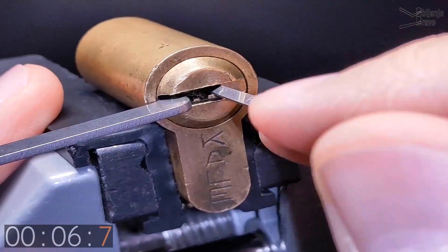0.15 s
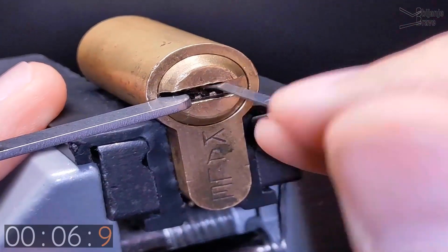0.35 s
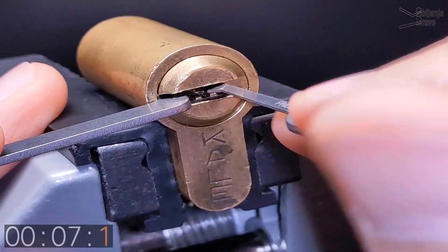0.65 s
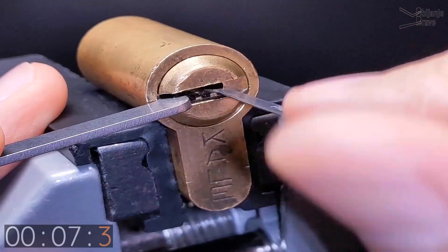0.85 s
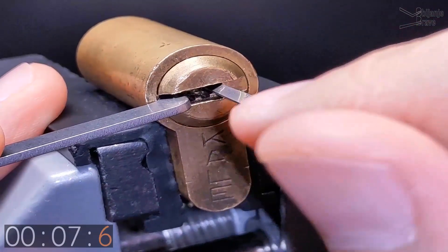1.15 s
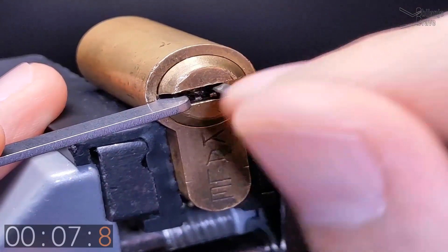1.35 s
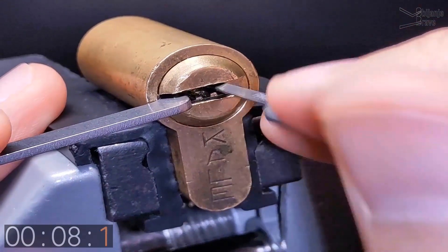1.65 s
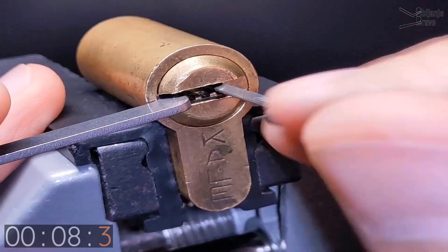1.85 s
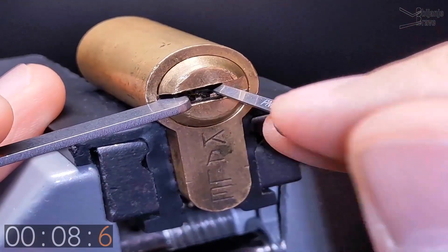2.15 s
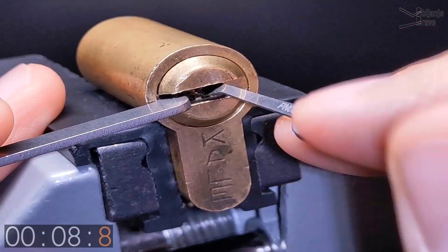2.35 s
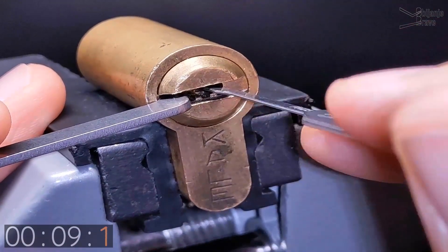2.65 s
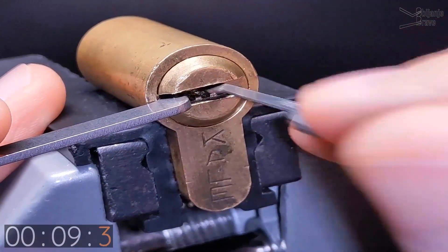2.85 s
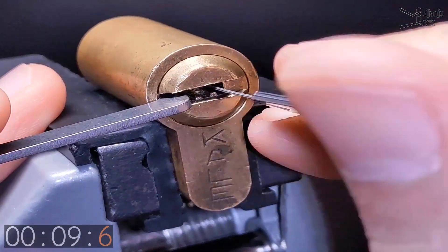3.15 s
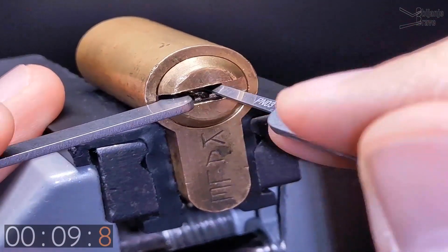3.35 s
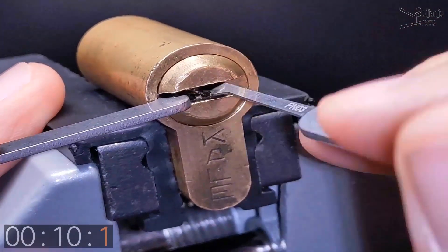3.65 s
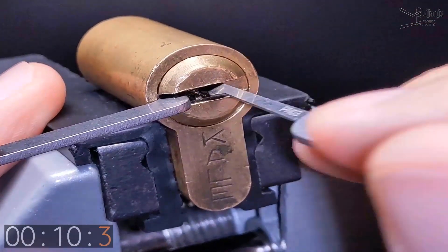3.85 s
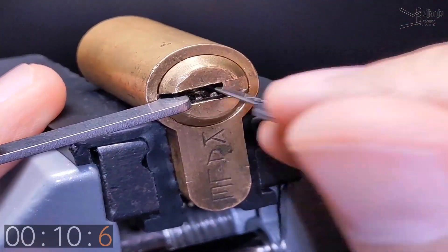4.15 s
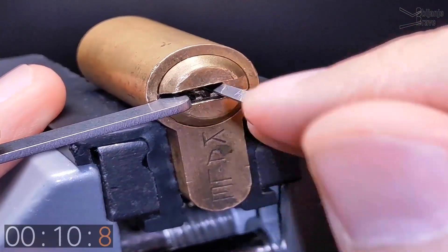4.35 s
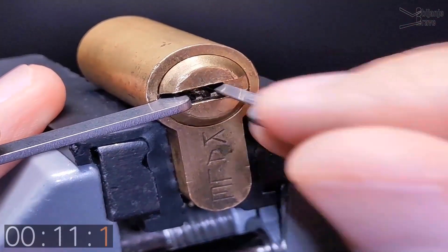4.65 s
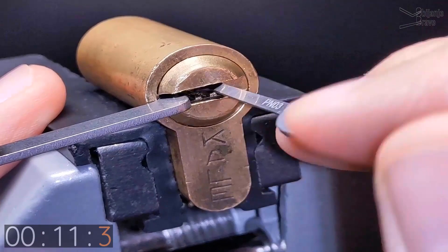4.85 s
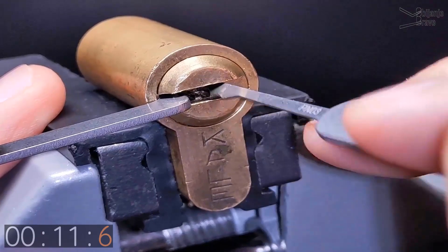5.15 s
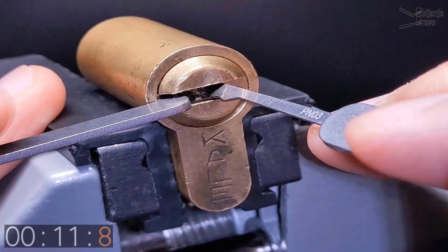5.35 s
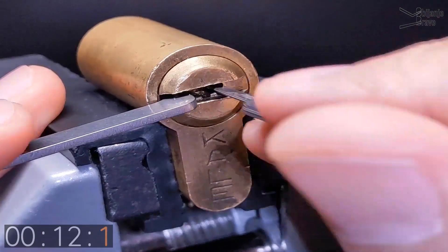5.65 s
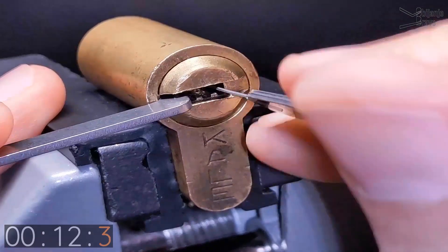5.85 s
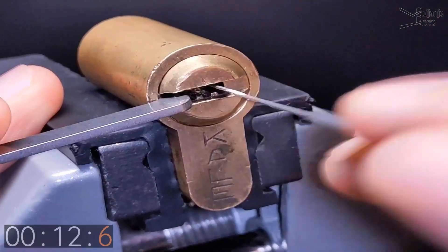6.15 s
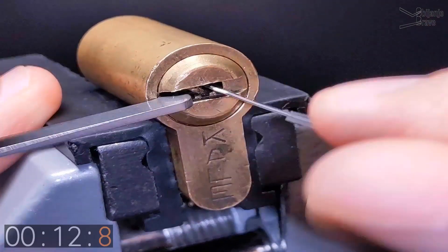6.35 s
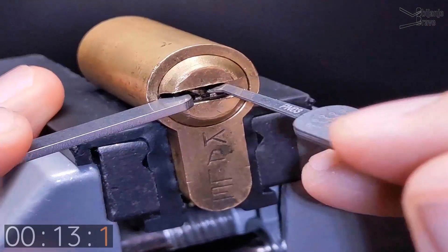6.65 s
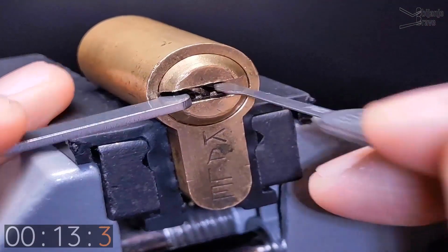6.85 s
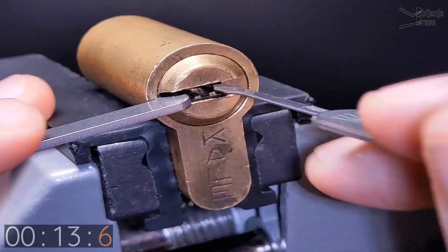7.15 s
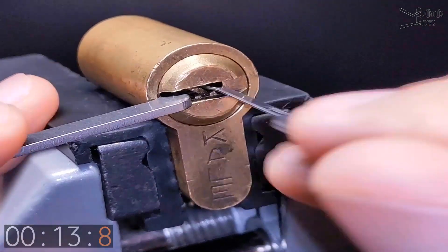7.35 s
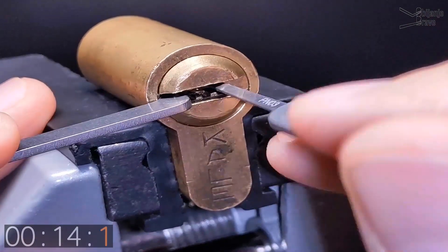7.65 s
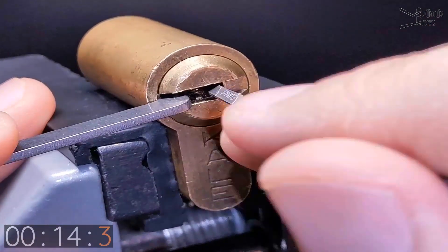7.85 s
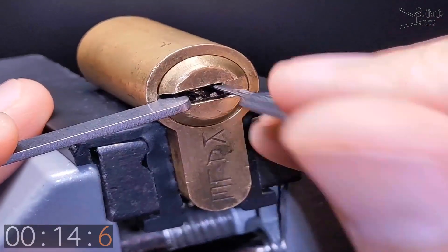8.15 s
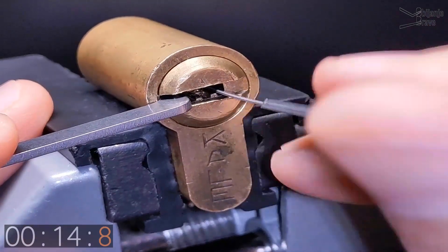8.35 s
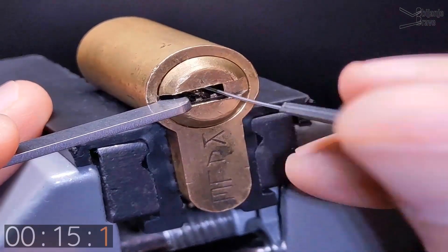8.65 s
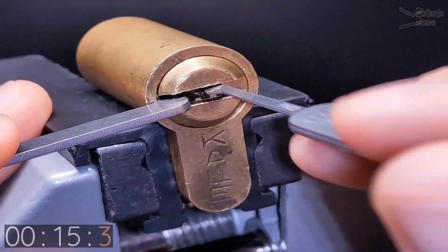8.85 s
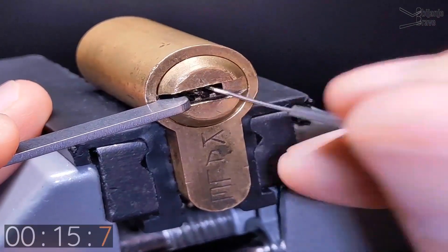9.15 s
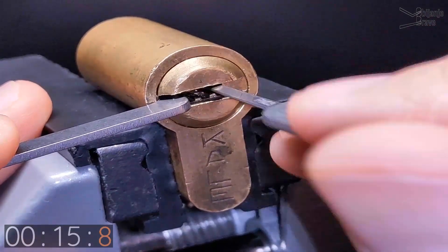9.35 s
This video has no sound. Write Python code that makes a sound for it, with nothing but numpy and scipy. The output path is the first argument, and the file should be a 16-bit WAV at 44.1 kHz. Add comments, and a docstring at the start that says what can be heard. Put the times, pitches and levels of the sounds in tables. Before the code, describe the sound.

Very close, quiet lock picking: pins snap off a steel blade with dry bright clicks, some doubled by a softer rebound, with light rattling between them. The blade's rubbing is almost inaudible. Sparse at first, busier and heavier after six seconds, when hands thud softly against the vice and the cylinder clunks in its jaws, then lighter again. A deep, gently swelling hum, low rumble and faint hiss continue throughout in a small room.

```python
"""Over a low, slowly swelling hum and a faint hiss, pins tick close to the microphone in a quiet room.
A steel pick is raked in and out of a brass lock cylinder held in a small vice on a bench.
Each snap is noise bursts and decaying sines: a bright tick, a knock of the lock body, a shudder of the clamp.
Jostled pins rattle lightly during the strokes, whose own rub is all but inaudible; once the blade squeaks.
The hands bump the vice and the cylinder shifts in its jaws: soft pushes into resonances, with a short room tail."""
import sys
import numpy as np
from scipy import signal
from scipy.fft import rfft, irfft
from scipy.io import wavfile
from scipy.ndimage import uniform_filter1d

SR = 44100
rng = np.random.default_rng(int(sys.argv[2]) if len(sys.argv) > 2 else 0)


def unload_audio(sound):
    """Save the sound as a 16-bit wav file, at the path given as the first command line argument."""
    columns = np.transpose(np.atleast_2d(sound))
    # keep every value between -1 and 1, then stretch to whole-number steps
    steps = np.round(np.clip(columns, -1, 1) * 32767)
    wavfile.write(sys.argv[1], SR, steps.astype(np.int16))


N = 418950
TIME = np.arange(N) / SR  # s

# Pins snapping over the pick, levels before each layer's offset. Each row: time in seconds, tick level in dB
# over 10 ms, tick centre in Hz, knock level in dB over 10 ms, knock centre in Hz.
PIN_SNAPS = [(0.088, -48.5, 7760, -54.5, 810), (0.2926, -49.5, 7000, -50.5, 1180),
             (0.4072, -43.5, 7200, -59, 1076), (0.5121, -27, 8800, -43.5, 890),
             (0.587, -53, 7230, -55.5, 1010), (0.774, -63.5, 7910, -65, 884), (0.9, -50, 8000, -54, 1060),
             (0.9494, -56, 5890, -59, 990), (1.0612, -49.5, 7800, -57, 790), (1.0747, -51, 8000, -57, 740),
             (1.096, -51.5, 8100, -58, 940), (1.2832, -45, 8000, -53, 1740),
             (1.2872, -46.5, 8220, -68, 1470), (1.4372, -54, 8650, -67, 1150),
             (1.446, -49.5, 9500, -61, 600), (1.618, -55, 7950, -56, 1700), (1.7611, -54, 7970, -57.5, 935),
             (1.943, -56.5, 6997, -57.5, 1239), (2.07, -50, 7120, -54.5, 1179),
             (2.2775, -55, 7100, -59, 1180), (2.4169, -50, 8100, -56, 930),
             (2.7789, -39.5, 7250, -48.5, 890), (2.9244, -39.5, 8210, -57.5, 1151),
             (3.04, -56, 8000, -61, 939), (3.3323, -49, 8610, -61, 1810), (3.34, -45, 8710, -61, 860),
             (3.3493, -47.5, 8197, -59, 706), (3.5791, -52, 7200, -62.5, 1610),
             (3.6252, -61, 4740, -62, 921.5), (3.9887, -50.5, 8010, -55, 1090),
             (4.0078, -53.5, 5800, -59.5, 1330), (4.146, -49, 8000, -58.5, 797),
             (4.1689, -46.5, 7110, -57.5, 915), (4.2998, -43, 8140, -57.5, 666),
             (4.3318, -49, 6960, -62, 906), (4.366, -35, 7960, -42.5, 940),
             (4.7457, -51.5, 8100, -53.5, 1660), (4.885, -48.5, 7600, -56, 990),
             (4.8977, -45, 7050, -52, 860), (5.1244, -62, 6924, -57.5, 1120),
             (5.244, -61, 7110, -64.5, 903), (5.6129, -51, 7950, -58, 1075),
             (5.7289, -50.5, 9730, -69, 1375), (5.7912, -58.5, 4710, -60.5, 620),
             (6.1787, -45, 7535, -49.5, 720), (6.1921, -51, 6600, -49.5, 847.5),
             (6.2276, -43.5, 8264, -52, 784), (6.3857, -32.5, 6700, -39.5, 1560),
             (6.459, -43.5, 6904, -46.5, 1430), (6.835, -54, 6450, -51, 668.4),
             (6.9065, -46, 7490, -47, 845), (6.931, -36, 6900, -40.5, 1400),
             (7.0377, -55, 7650, -61, 749.4), (7.227, -74, 6220, -56.5, 790),
             (7.406, -63, 6550, -57.5, 1093), (7.4345, -54, 8000, -53, 1100),
             (7.5443, -35, 7800, -40, 1086), (7.7308, -59, 7060, -61, 1228), (7.8718, -50, 9100, -68, 1580),
             (7.8963, -40.5, 10000, -59, 1083), (7.9034, -46, 9250, -54.5, 745),
             (8.0262, -38, 9000, -43, 1760), (8.2851, -54, 7810, -72, 810), (8.3546, -44, 9240, -69, 1400),
             (8.3805, -48, 7405, -50.5, 1171), (8.5983, -59, 9090, -61, 710),
             (8.6647, -44.5, 7186, -53.5, 901.7), (9.073, -46.5, 7590, -58.5, 1015),
             (9.224, -76, 4160, -56.5, 860), (9.319, -60, 8990, -59, 719.8),
             (9.4539, -47.5, 7276, -52.5, 1878)]
# Strokes of the blade in the keyway, levels before each layer's scaling.
# Each row: start in seconds, end in seconds, steel level in dB, body level in dB.
BLADE_STROKES = [(0.044, 0.08, -60.5, -60), (0.271, 0.334, -59, -56.5), (0.411, 0.486, -57.5, -57.5),
                 (0.527, 0.594, -59, -67), (1.055, 1.124, -59, -65), (1.287, 1.332, -58.5, -59),
                 (1.42, 1.473, -56.5, -67), (1.734, 1.787, -61, -58.5), (1.911, 1.955, -68, -64),
                 (2.047, 2.105, -56, -62.5), (2.41, 2.438, -57, -61), (2.768, 2.8, -55, -64),
                 (2.922, 2.947, -52, -57), (3.316, 3.364, -52, -59), (3.549, 3.63, -58.5, -64),
                 (3.98, 4.02, -71, -66), (4.134, 4.178, -65, -66), (4.262, 4.307, -59, -75),
                 (4.372, 4.41, -65, -71), (4.755, 4.81, -60, -66), (4.862, 4.91, -54.5, -57.5),
                 (5.225, 5.262, -67, -67), (5.6, 5.668, -63.5, -67), (5.881, 5.908, -75, -58),
                 (6.167, 6.243, -50, -54), (6.395, 6.476, -52.5, -60), (6.758, 6.869, -73, -64),
                 (6.892, 6.966, -58, -52), (7.4, 7.461, -64, -60), (7.707, 7.75, -61, -67),
                 (7.899, 7.93, -53, -68), (8.244, 8.279, -58.5, -62), (8.334, 8.411, -61, -69),
                 (8.546, 8.614, -59.5, -63), (8.639, 8.689, -54, -65), (9.065, 9.092, -62, -69),
                 (9.275, 9.33, -54, -65), (9.413, 9.494, -58.5, -65.5)]
# Resonances of pick and pins. Each row: pitch in Hz, width in Hz, relative level in dB.
PICK_MODES = [(2710, 360, 8), (3576, 150, 6.5), (4370, 144, 3), (4824, 82, 0), (5320, 1000, -4.5),
              (6450, 250, 0), (7330, 2600, 0.5), (7760, 1050, -0.5), (8140, 1300, -6.5), (9340, 290, -2.5),
              (9280, 190, -6.5), (10250, 400, -5), (11800, 670, -14), (12160, 230, 4), (13480, 270, 1),
              (13600, 330, 3)]
# Resonances of cylinder and tension wrench. Each row: pitch in Hz, width in Hz, relative level in dB.
CYLINDER_MODES = [(447, 50, 0), (560, 55, 0), (825, 90, -1), (994, 110, 0), (1190, 130, -2),
                  (1400, 200, -10), (1705, 150, 0), (1900, 220, -7), (2345, 120, -6)]

HARD_DB = -36.5  # a snap with a tick above this level is hard
KNOCK_HZ = 1030  # centre of an ordinary knock


def from_db(db):
    """Decibels to gain."""
    return 10 ** (np.asarray(db) / 20)


def rms_one(x):
    """Scale to unit power."""
    return x / np.sqrt(np.mean(x ** 2) + 1e-30)


def at_level(x, db):
    """Give a short sound the energy of 10 ms at this level."""
    return x * from_db(db) * np.sqrt(.01 * SR / (np.sum(x ** 2) + 1e-30))


def add(out, s, x):
    """Mix x into out from time s on."""
    i = max(int(s * SR), 0)
    out[i:i + len(x)] += x[:max(N - i, 0)]


def band(x, low_hz, high_hz, order=2):
    """Butterworth band-pass."""
    sos = signal.butter(order, [low_hz, min(high_hz, .47 * SR)], "band", fs=SR, output="sos")
    return signal.sosfilt(sos, x)


def focus(x, hz, breadth):
    """Keep the part of the spectrum around hz, breadth in octaves; the flanks fall 12 dB an octave."""
    edge = 2 ** np.clip(breadth / 2, .05, 2)
    return band(band(x, hz / edge, hz * edge, order=1), hz / edge, hz * edge, order=1)


def resonance(x, hz, width):
    """One resonance with gain 1 on top."""
    r = np.exp(-np.pi * width / SR)
    feed = np.array([1, 0, -1]) * (1 - r * r) / 2
    feedback = [1, -2 * r * np.cos(2 * np.pi * hz / SR), r * r]
    return signal.lfilter(feed, feedback, x + 1e-18)


def shaped_noise(spectrum):
    """Steady noise with the given spectrum, rolled off beyond both ends, unit power."""
    hz, db = np.transpose(spectrum)
    bins = np.maximum(np.fft.rfftfreq(N, 1 / SR), 1)
    gain = from_db(np.interp(np.log(bins), np.log(hz), db))
    gain = gain / (1 + (hz[0] / bins) ** 2 / 2)
    gain = gain / np.hypot(1, (bins / hz[-1] / 2) ** 2)
    return rms_one(irfft(rfft(rng.standard_normal(N)) * gain, N))


def hum(drone_hz=48.9, drone_db=-48, swing=0.73, waver=0.15):
    """A low drone that swells slowly, and weaker lines that waver slightly in strength."""
    # Swell of the drone, its swing about the mean yet to be scaled. Each row: time in seconds, level in dB.
    drone_swell = [(0.0, -51), (0.05, -49), (0.92, -49.5), (1.8, -44.5), (2.62, -52.5), (3.55, -45.5),
                   (5.08, -48.5), (7.06, -47), (7.88, -52.5), (8.57, -45), (9.23, -48.5), (9.5, -54.5)]
    # Weaker lines above the drone. Each row: pitch in Hz, level in dB rms.
    weaker_lines = [(70.0, -59.5), (149.5, -74.5), (199.4, -74.5)]
    s, db = np.transpose(drone_swell)
    swell = np.interp(TIME, s, db)
    drone_gain = from_db(drone_db + swing * (swell - swell.mean()))
    drone = drone_gain * np.sin(2 * np.pi * (drone_hz * TIME + rng.random()))
    knots = np.arange(0, 12, 1 / 2)  # s, a new strength every half second
    lines = 0
    for hz, db in weaker_lines:
        strength = 1 + waver * np.interp(TIME, knots, rng.standard_normal(len(knots)))
        lines = lines + from_db(db) * strength * np.sin(2 * np.pi * (hz * TIME + rng.random()))
    return np.sqrt(2) * (drone + lines)  # rms to peak


def rumble(db=-56.5):
    """Still air in the room: steady low noise at this rms level."""
    # Each row: frequency in Hz, relative density in dB per Hz.
    air_spectrum = [(15, 0.5), (28, 0.5), (42, -5), (60, -6.5), (90, -9), (130, -12.5), (175, -22.5),
                    (230, -20), (320, -30.5)]
    return from_db(db) * shaped_noise(air_spectrum)


def hiss(db=-65):
    """Microphone hiss: steady broad noise at this rms level."""
    # Each row: frequency in Hz, relative density in dB per Hz.
    hiss_spectrum = [(150, -8), (250, -1.5), (318, 2.5), (384, -2), (641, -8), (984, -7.5), (1510, -11),
                     (1920, -8), (2240, -10), (2480, -10.5), (4680, -11.5), (7060, -8.5), (11000, -12.5),
                     (13800, -11.5), (15000, -55)]
    return from_db(db) * shaped_noise(hiss_spectrum)


def room(x, first_s=0.0039):
    """Diffuse reflections build up within milliseconds and die away band by band."""
    # Small room. Each row: low edge in Hz, high edge in Hz, 60 dB decay in seconds, level in dB before the band.
    reflections = [(192, 715, 0.23, -2), (640, 4600, 0.29, -9), (2530, 12000, 0.25, -11.5)]
    t = TIME[:SR // 2]
    response = 0
    for low_hz, high_hz, t60, db in reflections:
        build_up = np.clip(t / first_s - 1 / 2, 0, 1)
        tail = rng.standard_normal(len(t)) * from_db(-60 * t / t60) * build_up
        tail = tail / np.sqrt(np.sum(tail ** 2))
        response = response + from_db(db) * band(tail, low_hz, high_hz)
    return signal.fftconvolve(x, response)[:N]


def blows(table, modes, push_s, rock_s, rock_db, count=2):
    """Half-sine pushes set a heavy part ringing, all its modes in step; it rocks twice more before it settles."""
    out, t = np.zeros(N), TIME[:SR // 3]
    push = np.sin(np.pi * np.minimum(t / push_s, 1))
    for s, db in table:
        for k in range(count + 1):
            thump = 0
            for hz, width, level in modes:
                thump = thump + from_db(level + rng.normal(0, 2.6)) * resonance(push, hz, width)
            thump = thump / np.abs(thump).max()
            add(out, s + k * rock_s, from_db(db + rock_db * np.sqrt(k)) * thump)
    return out


def bench_bumps():
    """The hands bump the vice on its bench, and the bench resonates low."""
    # Each row: time in seconds, peak of the first thump in dB.
    bumps = [(0.09, -49.5), (1.455, -46), (3.336, -51), (3.571, -48.5), (4.37, -50), (4.893, -46.5),
             (6.189, -31.5), (6.384, -45), (6.465, -42.5), (6.79, -42), (6.935, -38.5), (7.447, -37),
             (7.5545, -29.5)]
    # Bench under the vice. Each row: pitch in Hz, width in Hz, relative level in dB.
    bench_modes = [(80, 24, -3), (102.5, 25, 4), (127.7, 7.6, 15), (143, 3.9, -27), (208, 57, -9)]
    return blows(bumps, bench_modes, push_s=0.0042, rock_s=.041, rock_db=-9.5)


def jaw_clunks():
    """The cylinder shifts in the vice jaws; a shorter push rings them higher than the bench."""
    # Each row: time in seconds, peak of the first thump in dB.
    clunks = [(0.32, -48), (0.514, -43), (3.632, -46.5), (4.378, -46), (5.796, -41.5), (6.2, -41.5),
              (6.838, -48), (7.5455, -31.5)]
    # Vice jaws. Each row: pitch in Hz, width in Hz, relative level in dB.
    jaw_modes = [(240, 44, -8), (368, 69, -4), (426, 53, 6.5), (523, 32, 4)]
    return blows(clunks, jaw_modes, push_s=0.0012, rock_s=.036, rock_db=-15.5)


def ring(force, modes, vary_db, detune):
    """Every contact feeds the modes with strengths and signs of its own; its pressure shifts them a little."""
    size, side, shift = rng.standard_normal((3, len(modes)))
    out = 0
    for k, (hz, width, db) in enumerate(modes):
        gain = np.sign(side[k]) * from_db(db + vary_db * size[k])
        out = out + gain * resonance(force, hz * (1 + detune * shift[k]), width)
    return out


def steel(force, crack_db):
    """The ring of pick and pins, plus the bare crack of the contact."""
    crack = from_db(crack_db) * band(force, 2720, 12900)
    return ring(force, PICK_MODES, vary_db=2.0, detune=0.019) + crack


def body(force, thud_db):
    """The ring of the clamped cylinder, plus its dead thud."""
    thud = from_db(thud_db) * band(force, 260, 3500)
    return ring(force, CYLINDER_MODES, vary_db=1.0, detune=0.014) + thud


def rasp(force, low_hz=2100, high_hz=5600):
    """Dry grit of steel on brass, between the main ring of the body and that of the pick."""
    return band(force, low_hz, high_hz)


def steel_pitch(s):
    """The blade rings at the pitch of the pin it is working on: the snap nearest in time."""
    return min(PIN_SNAPS, key=lambda snap: abs(snap[0] - s))[2]


def slips(per_s=3000):
    """Friction force: dense tiny slips of uneven size, scaled by uneven pressure."""
    pressure = from_db(2.5 * rms_one(uniform_filter1d(rng.standard_normal(N), size=180)))
    return pressure * (rng.random(N) < per_s / SR) * rng.standard_normal(N)


def slides(steel_db=-.3, body_db=.5, rasp_db=-6.5, rub_db=-4, fade_s=.006,
           breadth=1.4, firm_db=-57, octaves_per_db=-3.0):
    """The sliding blade drives the same metal as the snaps do, and rubs dully through the vice, very faintly."""
    out, friction = np.zeros(N), slips()
    for start, end, steel_level, body_level in BLADE_STROKES:
        length = max(end - start, fade_s)
        t = TIME[:int((length + .04) * SR)]  # 40 ms for the ring to die away
        fade = np.clip(np.minimum(t, length - t) / fade_s, 0, 1)
        force = np.resize(friction[int(start * SR):][:len(t)], len(t)) * fade
        # a firm stroke scrapes more narrowly
        octaves = breadth + octaves_per_db * max(steel_level - firm_db, 0)
        bright = focus(steel(force, crack_db=-4), steel_pitch(start + length / 2), octaves)
        bright = rms_one(bright) * from_db(steel_level + steel_db)
        grit = rms_one(rasp(force)) * from_db(steel_level + rasp_db)
        dull = resonance(body(force, thud_db=-5), 700, 1300)
        dull = rms_one(dull) * from_db(body_level + body_db)
        rub = rms_one(band(force, 220, 600)) * from_db(body_level + rub_db)
        # seconds over samples: this sets the stroke almost 50 dB down
        add(out, start, (bright + grit + dull + rub) * np.sqrt(length / len(t)))
    return out


def squeak(start=6.432, hz=6455, db=-40, rise_s=0.00081, hold_s=.012, t60=0.079, jitter_hz=45):
    """Stick-slip locks on to one mode of the pick for a moment: a sine of unsteady pitch."""
    t = TIME[:SR // 10]
    swell = (1 - np.exp(-t / rise_s)) * from_db(-60 * np.maximum(t - hold_s, 0) / t60)
    pitch = hz + jitter_hz * rms_one(uniform_filter1d(rng.standard_normal(len(t)), size=90))
    out = np.zeros(N)
    add(out, start, from_db(db) * swell * np.sin(2 * np.pi * np.cumsum(pitch) / SR))
    return out


def lead_ins(lead_s=.012, breadth=0.93, under_db=-12, swell_db=16, bright_limit_db=-62, dull_limit_db=-63):
    """A very faint noise swells for 12 ms before each snap, at a capped level."""
    out, t = np.zeros(N), TIME[:max(int(lead_s * SR), 2)]
    for s, tick_level, tick_hz, knock_level, knock_hz in PIN_SNAPS:
        noise = rng.laplace(0, 1, len(t)) * from_db(swell_db * t / lead_s)
        bright = focus(noise, tick_hz, breadth)
        bright = at_level(bright, min(tick_level + under_db, bright_limit_db))
        dull = resonance(noise, knock_hz, 1900)
        dull = at_level(dull, min(knock_level + under_db, dull_limit_db))
        add(out, s - lead_s, bright + dull)
    return out


def chatter(t60, impact, rise_s):
    """Force of one snap: the contact lets go, strikes, and its micro-bounces die within hundredths of a second."""
    t = TIME[:4096]
    force = rng.laplace(0, 1, len(t)) * from_db(-60 * t / t60) * np.minimum(t / rise_s, 1)
    force[int(rise_s * SR / 2)] = impact
    return force


def shudders(db=-7.5, db_per_octave=-5, rise_s=.005, t60=0.052, low_hz=420, high_hz=730, thud_db=-5):
    """Knocks pass on into the clamp, the dull ones most; the cylinder's low modes answer late and slowly."""
    out = np.zeros(N)
    for s, tick_level, tick_hz, knock_level, knock_hz in PIN_SNAPS:
        low = band(body(chatter(t60, impact=0, rise_s=rise_s), thud_db), low_hz, high_hz)
        level = knock_level + db + db_per_octave * np.log2(knock_hz / KNOCK_HZ)
        add(out, s, at_level(low, level))
    return out


def nearest(modes, hz):
    """Pitch of the mode that lies closest to hz."""
    return min((mode[0] for mode in modes), key=lambda f: abs(np.log(f / hz)))


def ping(hz, cycles=30, rise_s=0.00031):
    """A singing mode: a sine that dies away by 60 dB in 8.5 ms plus a few dozen cycles."""
    t = TIME[:SR // 10]
    t60 = 0.0085 + cycles / hz
    return np.sin(2 * np.pi * hz * t) * np.minimum(t / rise_s, 1) * from_db(-60 * t / t60)


def singing(steel_db=-15, body_db=-7.5, db_per_octave=3, reach_octaves=.42, count=3):
    """A snap sets the body mode nearest its knock singing; a hard one also steel modes around its tick."""
    out = np.zeros(N)
    for s, tick_level, tick_hz, knock_level, knock_hz in PIN_SNAPS:
        # high knocks sing most
        level = knock_level + body_db + db_per_octave * np.log2(knock_hz / KNOCK_HZ)
        add(out, s, at_level(ping(nearest(CYLINDER_MODES, knock_hz)), level))
        if tick_level > HARD_DB:
            for hz in tick_hz * 2 ** np.linspace(-2 * reach_octaves, reach_octaves / 2, count):
                add(out, s, at_level(ping(nearest(PICK_MODES, hz)), tick_level + steel_db))
    return out


def rebounds(after_s=.01, tick_db=-15.5, knock_db=-15.5):
    """A freed pin drops back once on its spring, more softly."""
    return [(s + after_s * rng.uniform(.6, 1.4), tick + tick_db, tick_hz, knock + knock_db, knock_hz)
            for s, tick, tick_hz, knock, knock_hz in PIN_SNAPS]


def jostles(per_s=45, tick_db=2, knock_db=-0.5, scatter_db=2.5):
    """Pins that the moving blade only jostles: light contacts scattered along each stroke."""
    touches = []
    for start, end, steel_level, body_level in BLADE_STROKES:
        count = max(int(round((end - start) * per_s)), 0)
        for k in range(count):
            s = start + (end - start) * (k + rng.random()) / count
            tick, knock = scatter_db * rng.standard_normal(2)
            tick_level = steel_level + tick_db + tick
            knock_level = body_level + knock_db + knock
            touches.append((s, tick_level, steel_pitch(s), knock_level, rng.uniform(425, 990)))
    return touches


def tick_width(hz, db, full_ring_hz=6900, full_octaves=1.48, purer_per_octave=2.13, octaves_per_db=-0.02):
    """Octaves a tick spans: most where the steel rings most fully, less away from there and in hard snaps."""
    away = abs(np.log2(hz / full_ring_hz))
    return full_octaves / (1 + purer_per_octave * away) + octaves_per_db * max(db - HARD_DB, 0)


def snaps(tick_db=0.1, knock_db=-2.0, rasp_db=-17.0, spit_db=-16, knock_breadth=1.7, crack_per_hard_db=0.77):
    """Pins slip off the pick; where each strikes decides which modes speak, and hard snaps crack more than ring."""
    out = np.zeros(N)
    for s, tick_level, tick_hz, knock_level, knock_hz in PIN_SNAPS + rebounds() + jostles():
        octaves = tick_width(tick_hz, tick_level)
        crack = crack_per_hard_db * max(tick_level - HARD_DB, 0)  # dB
        force = chatter(t60=0.028, impact=7.9, rise_s=.0009)
        tick = focus(steel(force, crack_db=-2.5), tick_hz, octaves)
        tick = at_level(tick, tick_level + tick_db - crack / 2)
        knock = body(chatter(t60=0.027, impact=6.4, rise_s=0.0014), thud_db=-11)
        knock = at_level(focus(knock, knock_hz, knock_breadth), knock_level + knock_db)
        # a narrow tick has little grit
        grit = at_level(rasp(force), tick_level + rasp_db + crack) * min(octaves, 1)
        # the sharp edge of the contact
        spit = at_level(band(force, 9900, 13400), tick_level + spit_db + crack)
        add(out, s, tick + grit + spit + knock)
    return out


def scene():
    """The lock in its room, over hum, rumble and hiss."""
    background = hum() + rumble() + hiss()
    picking = slides() + squeak() + lead_ins() + shudders() + singing() + snaps()
    lock = bench_bumps() + jaw_clunks() + picking
    return (lock + room(lock) + background)[None]


def record(dry):
    """The top is cut steeply at 15 kHz."""
    return signal.sosfilt(signal.ellip(10, .2, 80, 15000, fs=SR, output="sos"), dry)


dry = scene()
out = record(dry)
unload_audio(out)
```